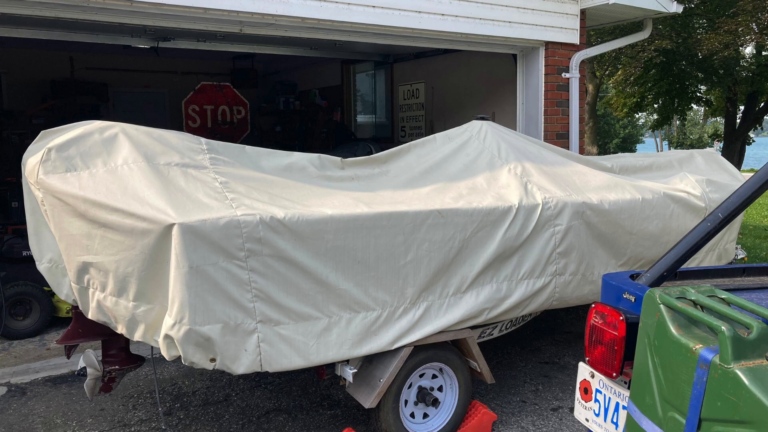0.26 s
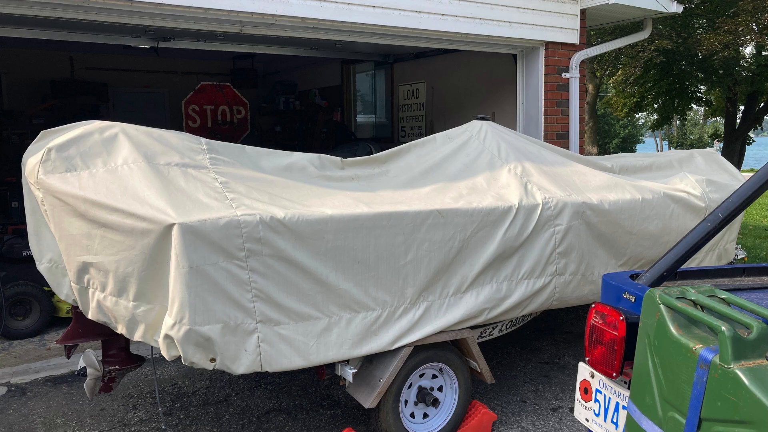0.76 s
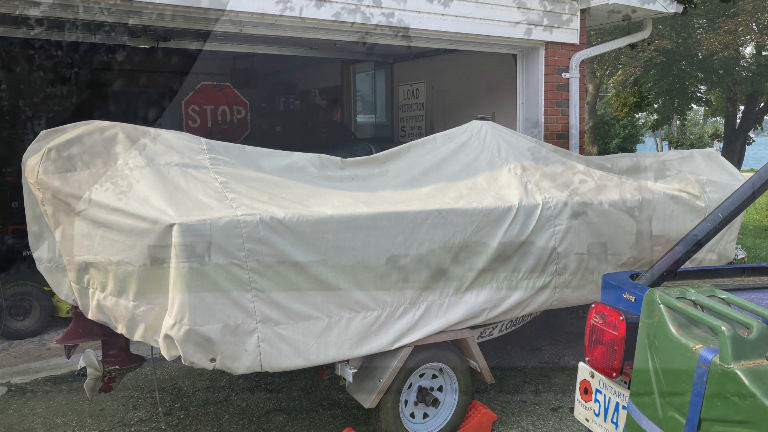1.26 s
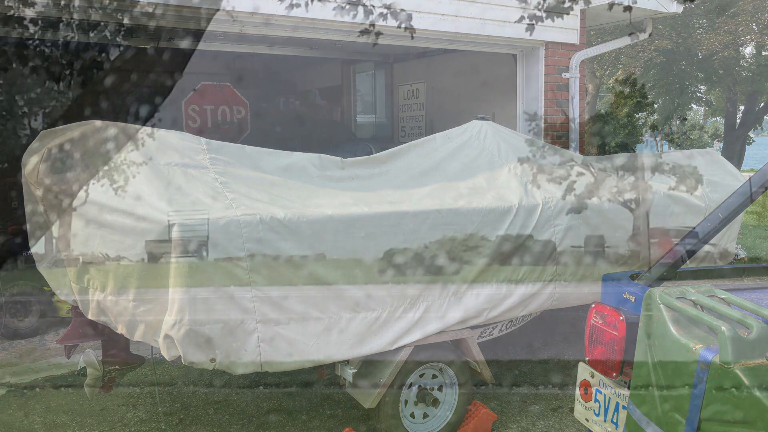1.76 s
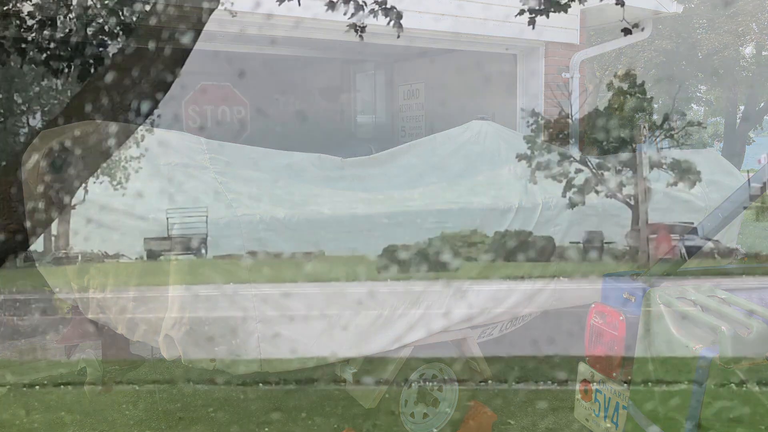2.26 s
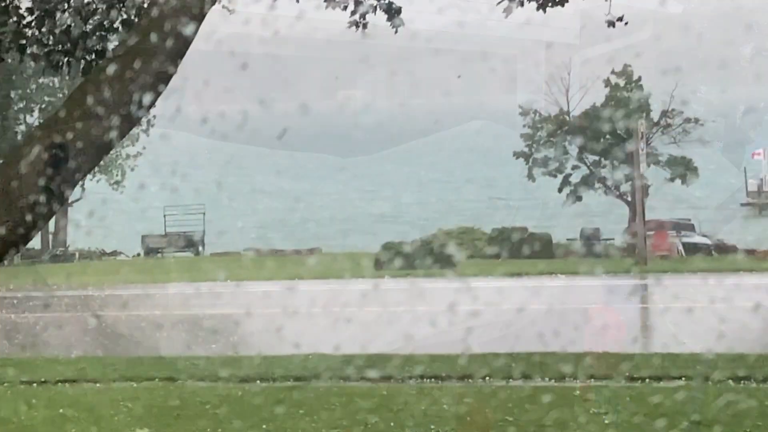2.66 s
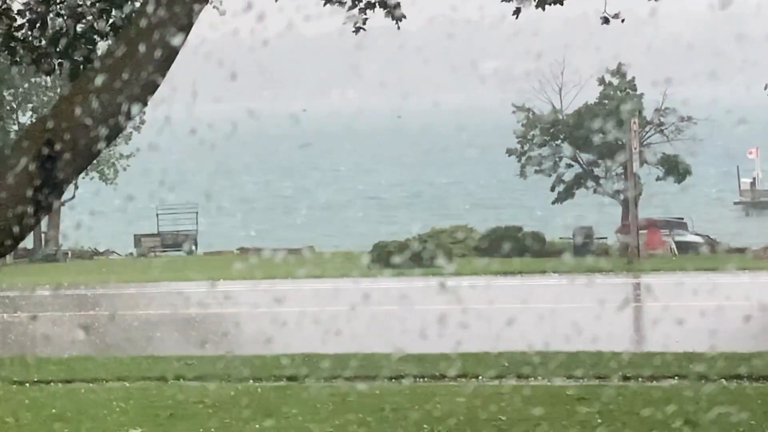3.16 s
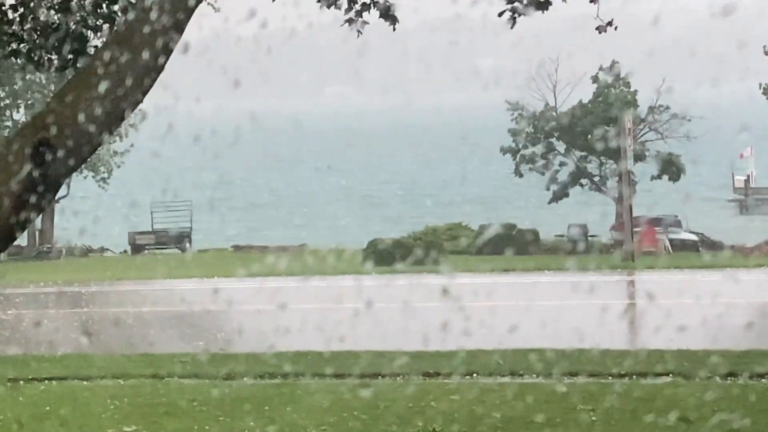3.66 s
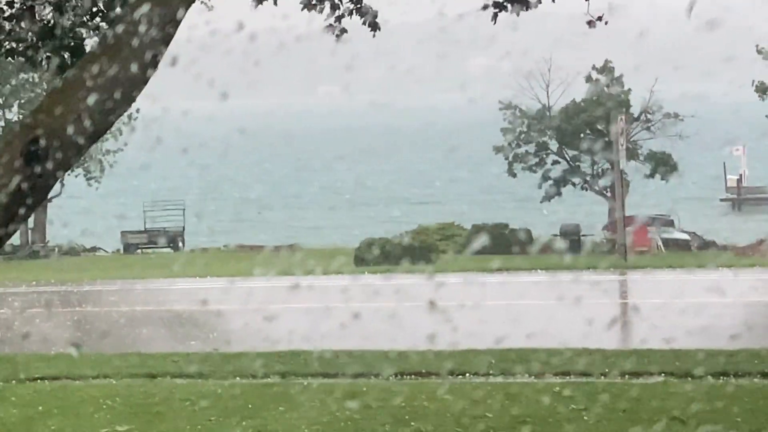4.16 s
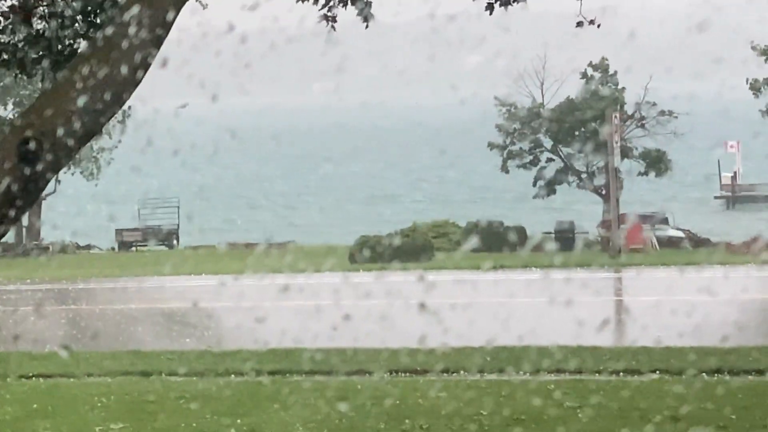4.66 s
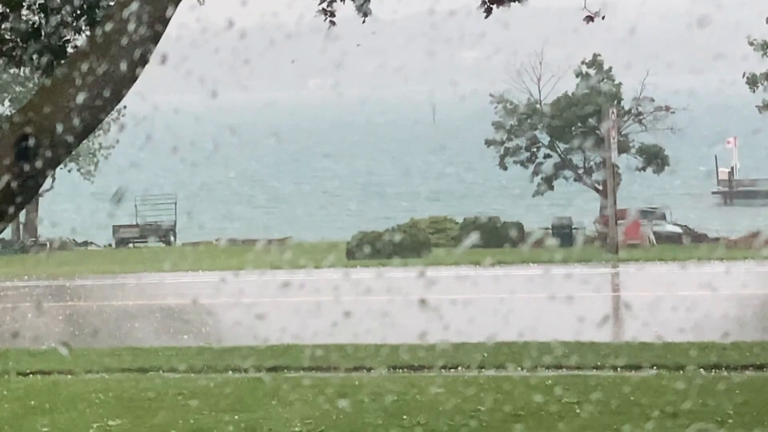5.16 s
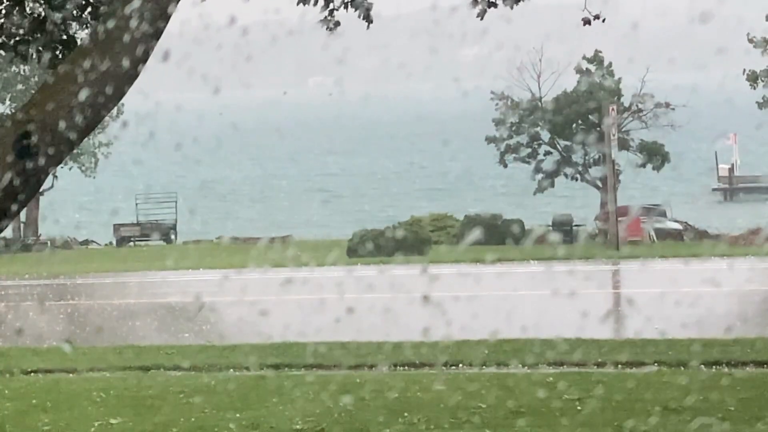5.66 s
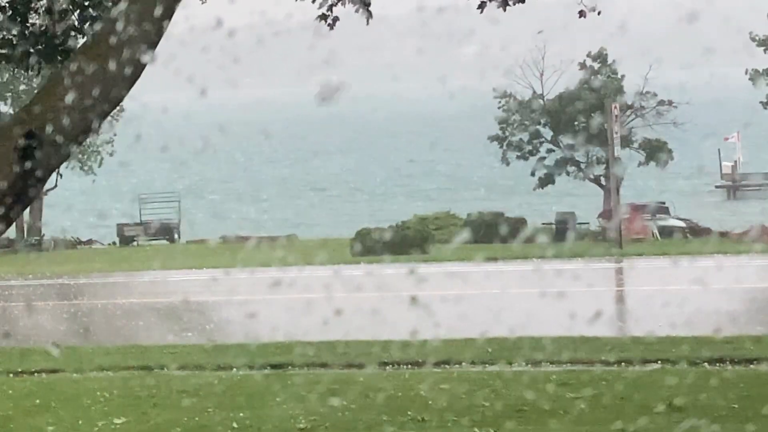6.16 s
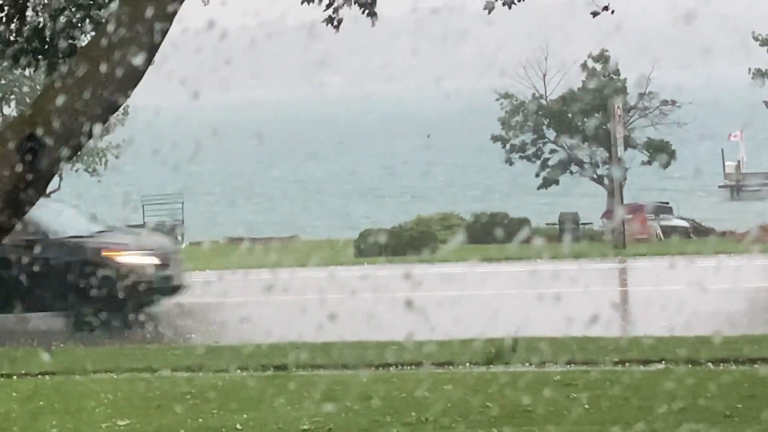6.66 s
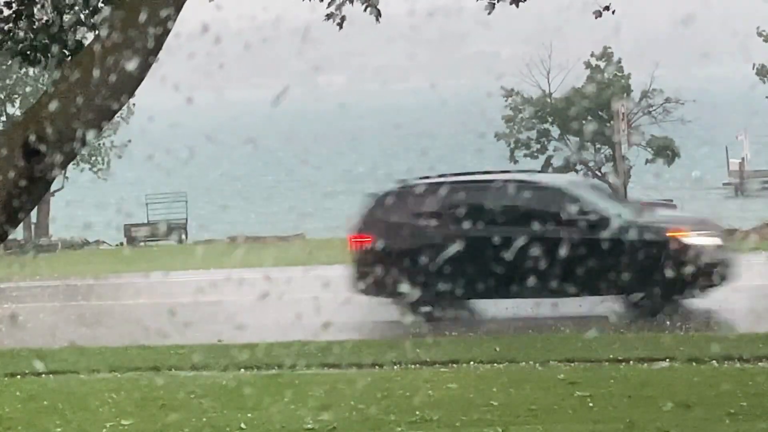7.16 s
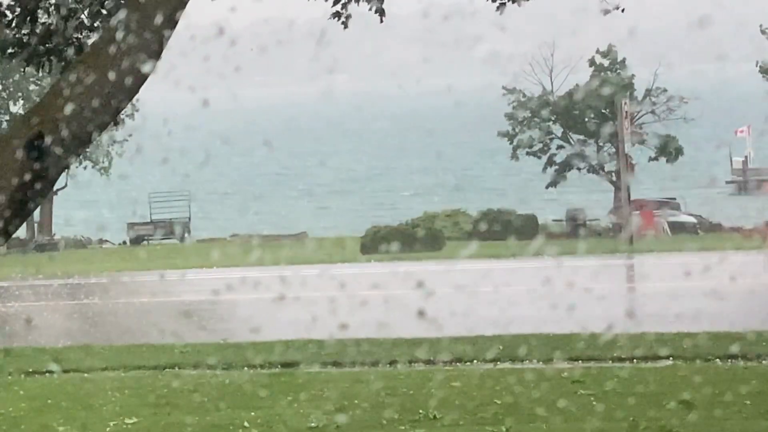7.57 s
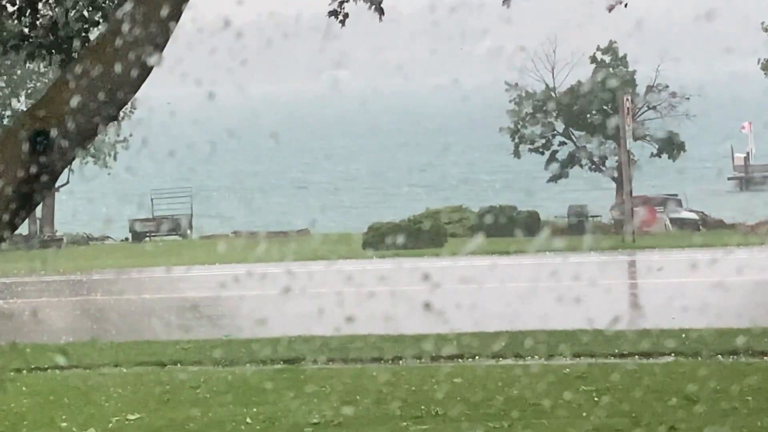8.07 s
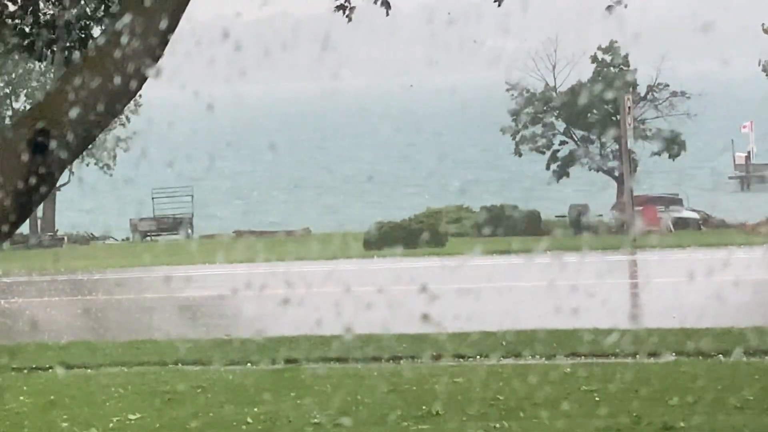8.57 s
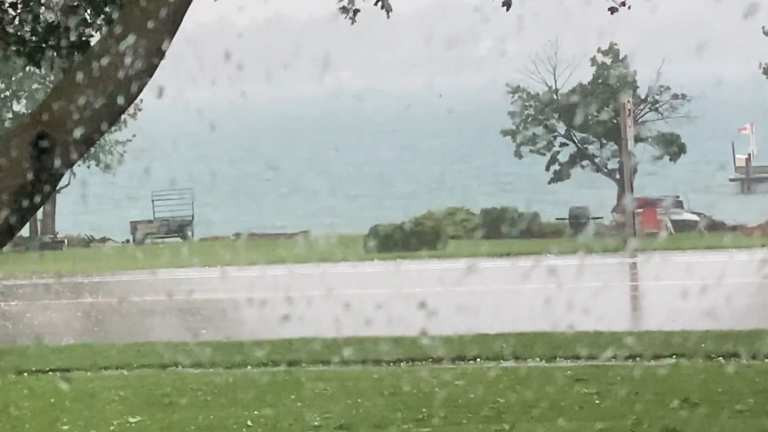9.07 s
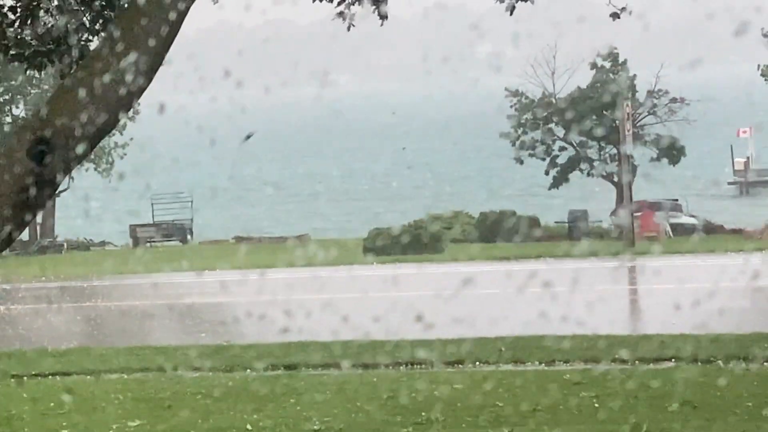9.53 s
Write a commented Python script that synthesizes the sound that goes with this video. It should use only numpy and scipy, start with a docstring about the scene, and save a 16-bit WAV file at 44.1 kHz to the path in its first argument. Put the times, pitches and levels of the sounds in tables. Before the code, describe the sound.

Inside a room close to a window, heavy rain drums on the pane after a slow fade-in. A thick, dull, steady patter carries random louder knocks and hollow plops, short watery fizzes and light ticks. Low gusty booming swells beneath. Around the middle, wet tyres add a barely noticeable high hiss. Big drops cluster more thickly near the end, and the rain continues to the cut.

```python
"""In a room, behind a window, storm rain is heard beating on the glass; the sound fades in.
Big drops thud and tap over a patter of small ones: each excites the pane, shaped as ringing noise.
Water sprays, spits and drips as short bursts of filtered noise over a steady wash of rain outdoors.
Wind and drops make the pane boom in its lowest modes, and a car hisses by faintly on the wet road."""
import sys
import numpy as np
from scipy import signal
from scipy.fft import irfft
from scipy.io import wavfile
from scipy.ndimage import uniform_filter1d

SR = 44100
rng = np.random.default_rng(int(sys.argv[2]) if len(sys.argv) > 2 else 0)


def master_out(mix):
    """Clip the mix to full scale and print it as 16-bit PCM to the path in sys.argv[1]."""
    frames = np.transpose(np.atleast_2d(mix))
    ceiling = np.clip(frames, -1, 1)
    pcm = np.round(ceiling * 32767).astype(np.int16)
    wavfile.write(sys.argv[1], SR, pcm)


N = 432180
TIME = np.arange(N) / SR  # seconds

# Big drops on the glass, landing at once or breaking up over several ms; levels are relative:
# start_s [s], knock_db [dB], thud_db [dB], tap_db [dB], rise_ms [ms]
BIG_DROPS = [(1.123, -29, -35, -38, 0.89), (1.444, -29, -31, -64, 1), (1.51, -29, -34, -47, 22),
             (1.642, -31.5, -31, -51, 3), (2.104, -26.5, -37, -44.5, 17), (2.145, -34, -36, -43.5, 31),
             (2.215, -33, -36, -48, 2.7), (2.381, -27.5, -40, -62, 15), (2.77, -29, -27.5, -49, 0.92),
             (2.796, -42, -29, -48, 1.6), (2.866, -28, -50, -40.5, 15), (2.986, -25, -22, -38.5, 0.9),
             (3.096, -28.5, -32, -45.5, 1.1), (3.422, -30, -24.5, -38, 1.5), (3.592, -30, -57, -65, 4.9),
             (3.655, -51, -36, -66, 5.6), (3.722, -29.5, -32.5, -43, 16), (3.901, -24.5, -29.5, -47.5, 14),
             (3.968, -25, -26, -43.5, 11), (4.038, -29, -49, -43, 12), (4.189, -30, -31.5, -45, 1),
             (4.212, -31, -25.5, -59, 2.6), (4.352, -22, -33.5, -47.5, 1), (4.649, -31.5, -35, -48.5, 13),
             (4.878, -29.5, -45, -48, 13), (4.94, -26, -61, -41, 7.4), (5.238, -31, -55, -42.5, 8.5),
             (5.34, -31.5, -28.5, -47, 4.1), (5.454, -31.5, -33, -43, 4.3), (5.668, -30.5, -33, -42, 1.3),
             (5.714, -23.5, -36, -39.5, 3.6), (5.769, -31, -31.5, -48, 1.7), (5.844, -49, -31, -47, 2.9),
             (5.927, -27.5, -29.5, -38, 1), (6.058, -24.5, -30, -46, 15), (6.105, -39, -40, -46, 1.9),
             (6.338, -19.5, -38.5, -48.5, 8), (6.831, -30, -35, -66, 13), (6.86, -31.5, -27, -48, 5.6),
             (7.122, -29.5, -26.5, -46.5, 18), (7.315, -25, -37, -42, 0.84), (7.345, -24.5, -27, -46, 1.9),
             (7.45, -35, -34, -48, 2.9), (7.683, -38, -31, -48, 0.92), (7.73, -33, -37, -49, 7.7),
             (7.778, -26, -35, -51, 15), (8.054, -40, -31, -52, 9), (8.485, -41, -25.5, -39.5, 0.86),
             (8.505, -27.5, -24, -49, 1.6), (8.619, -36, -30, -73, 4.4), (8.812, -28, -33.5, -54, 7.7),
             (8.936, -21.5, -37, -39, 1.1), (8.96, -24.5, -29.5, -70, 5.3), (9.17, -32, -34.5, -49.5, 5.1),
             (9.425, -28, -29, -48, 0.9), (9.497, -34, -35, -46, 2.3), (9.595, -45, -25.5, -62, 1),
             (9.614, -28, -49, -58, 1), (9.662, -25, -40.5, -44, 3.2), (9.695, -35, -33, -38.5, 10),
             (9.743, -17.5, -39, -40, 3.9)]
# Strength of the storm over time: time_s [s], level_db [dB, relative]
STORM_STRENGTH = [(1.2, -42), (2.6, -42.5), (2.98, -42.5), (3.28, -38.5), (3.38, -43.5), (3.55, -40.5),
                  (4.12, -42.5), (4.55, -43), (4.94, -39.5), (5.65, -40.5), (6.45, -40.5), (6.75, -40.5),
                  (7.2, -43), (7.63, -42), (7.8, -42.5), (8.2, -45.5), (8.5, -42.5), (8.71, -39),
                  (9.28, -43.5), (9.58, -36.5), (9.8, -39.5)]


def from_db(db):
    """Turns decibels into a factor of amplitude."""
    return 10 ** (np.asarray(db) / 20)


def read(points, hz, axis=1):
    """Reads one column of a table, joined by straight lines on a log-frequency axis."""
    table = np.transpose(points)
    return np.interp(np.log(hz + 1), np.log(table[0] + 1), table[axis])


def evened(x, size=None):
    """Scales a stereo sound so that the mean of its channels has rms 1 over its first samples, or all."""
    middle = x.mean(0)[:size]
    return x / np.sqrt(np.mean(middle ** 2) + 1e-20)


def add(mix, start_s, sound):
    """Adds a sound to the mix at its start time, cut off where the mix ends."""
    part = mix[:, max(round(start_s * SR), 0):][:, :sound.shape[1]]
    part += sound[:, :part.shape[1]]


def diffuse(hz):
    """Random spectrum of sound from many directions at two microphone ports, about flat in their sum."""
    # The two ports: pitch_hz [Hz], coherence [0 to 1], left_lead_rad [radians], left_minus_right_db [dB]
    ports = [(50, .99, 0, -1.2), (150, .95, -.05, -1.3), (380, .72, .1, -.4), (600, .18, .3, 1.8),
             (800, .33, .4, 1.8), (1100, .05, 0, 1), (1250, .17, -2.5, .6), (1650, .6, -2.4, 0),
             (2000, .38, -2.2, .3), (2250, .25, 0, 1.6), (2900, .22, 1.8, 1), (4400, .12, -.5, .5),
             (5600, .4, 2.2, 0), (6700, .85, 0, 0), (10000, .96, 0, 0)]
    shared, separate = rng.standard_normal((2, len(hz))) + 1j * rng.standard_normal((2, len(hz)))
    same = np.clip(read(ports, hz, axis=1), 0, 1)
    phase = read(ports, hz, axis=2)
    right = (same * shared + np.sqrt(1 - same ** 2) * separate) * np.exp(-1j * phase)
    lean = from_db(read(ports, hz, axis=3) / 2)
    return np.array([shared * lean, right / lean]) / np.sqrt(1.001 + same * np.cos(phase))


def noise(colour, size):
    """Stereo noise whose gain over frequency is the function colour."""
    hz = np.fft.rfftfreq(size, 1 / SR)
    return evened(irfft(diffuse(hz) * colour(hz), size))


def firm(x, size):
    """Holds the level of a stereo ring even, so that it can die away solidly instead of fluttering."""
    power = (x ** 2).mean(-2, keepdims=True)
    power = uniform_filter1d(uniform_filter1d(power, size), size)
    return x * np.sqrt(power.mean(-1, keepdims=True) / (abs(power) + 1e-30))


def hump(centre_hz, octaves):
    """A bell-shaped band on the octave scale; octaves is its standard deviation."""
    return lambda hz: np.exp(-.5 * (np.log2((hz + 1) / centre_hz) / octaves) ** 2)


def blows(count, crack, smack_db=0, crack_s=.016, uneven_db=4.2, size=12288):
    """Responses of the pane, each struck at another spot: (thud, knock, tap, splash) parts of each."""
    # Colour of a blow on the glass: pitch_hz [Hz], level_db [dB per Hz, relative]
    glass = [(60, 0.5), (110, 0.5), (180, 4.5), (270, -4), (400, -8), (560, -14), (820, -17), (1150, -26.5),
             (1750, -31), (2250, -23.5), (2900, -35.5), (4600, -34.5), (5700, -49.5), (8000, -51),
             (12000, -100)]
    # Modes of the pane and its frame: pitch_hz [Hz], width_hz [Hz, at half the lift], lift_db [dB]
    pane_modes = [(116.64, 3.6, 13), (166.3, 9.8, 4.5), (220, 6.4, 7), (289.5, 13.6, 8), (334, 12, 5.5),
                  (369, 14, 3), (403, 26, 4), (509.4, 6.3, 4.5), (1956, 41, 6.5)]
    # Ring of pane and room, from thud to splash: pitch_hz [Hz], rise_s [s], time to fall by 60 dB [s]
    ring = [(267, 0.0031, 0.64), (700, 0.0024, 0.39), (2210, 0.0054, 0.63), (4600, 0.0086, 0.53)]
    hz, t = np.fft.rfftfreq(size, 1 / SR), np.arange(size) / SR
    colour_db = read(glass, hz)
    for mode_hz, width_hz, lift_db in pane_modes:
        colour_db = colour_db + lift_db / (1 + (2 * (hz - mode_hz) / width_hz) ** 2)
    colour_db = colour_db + smack_db * hump(1450, .35)(hz)
    colour = from_db(colour_db) * hz ** 2 / (hz ** 2 + 45 ** 2)  # less bass below 45 Hz
    centres_hz, rise_s, t60_s = np.transpose(ring)
    # four bands that cross over into one another
    bands = np.array([np.interp(np.log(hz + 1), np.log(centres_hz), row) for row in np.eye(len(ring))])
    # the glass cracks out first, then the room dies away
    rising = 1 - np.exp(-t / rise_s[:, None])
    cracking = 1 + crack * np.exp(-t / crack_s)
    falling = np.exp(-np.log(1000) * t / t60_s[:, None])
    shape = rising * cracking * falling
    places_hz = np.linspace(0, np.sqrt(SR / 2), 130) ** 2  # closer together in the bass
    for _ in range(count):
        # each spot drives some modes well and misses others
        spot = from_db(uneven_db * np.interp(hz, places_hz, rng.standard_normal(len(places_hz))))
        struck = irfft(diffuse(hz) * (spot * colour * bands)[:, None], size)
        yield firm(struck, size=900) * shape[:, None]


def drop_size(draw):
    """Turns an even draw from 0 to 1 into a size: mostly small, seldom big, never above 3."""
    return min(-np.log(1 - draw), 3)


def drips(count, low_hz, span_octaves, level_db, fall_db, spread_db, octaves, rise_s, ring_s):
    """Scattered short bands of noise, each at its own pitch; fall_db is added per octave upward."""
    out, t = np.zeros((2, N)), np.arange(4096) / SR
    envelope = (1 - np.exp(-t / rise_s)) * np.exp(-t / ring_s)
    for when, height, size in rng.random((count, 3)):
        above = span_octaves * height
        note = noise(hump(low_hz * 2 ** above, octaves), size=len(t)) * envelope
        add(out, when * N / SR, note * from_db(level_db + fall_db * above + spread_db * size ** 2))
    return out


def wash(level_db=-47):
    """The far, steady wash of rain outdoors: coloured noise."""
    # Colour of the wash: pitch_hz [Hz], level_db [dB per Hz, relative]
    wash_colour = [(25, -6), (100, 14), (500, -6.5), (2300, -14), (4600, -27.5), (6000, -43), (9000, -34),
                   (13000, -34), (14500, -53)]
    return from_db(level_db) * noise(lambda hz: from_db(read(wash_colour, hz)), N)


def patter(level_db=5, body_db=-4.5, knock_db=2.0, per_s=135, spread_db=2.5, colour_db=2):
    """Small drops of uneven size strike spots all over the pane, harder in the gusts."""
    out = np.zeros((2, N))
    spots = list(blows(count=28, crack=1.3, crack_s=.011))
    drops_per_spot = round(per_s * N / SR / len(spots))
    for parts in spots:
        shares = from_db(colour_db * rng.standard_normal(len(parts)) + [body_db, knock_db, 0, 0])
        blow = np.tensordot(shares, parts, 1)  # the four parts mixed
        for when, draw in rng.random((drops_per_spot, 2)):
            add(out, when * N / SR, blow * from_db(spread_db * drop_size(draw)))
    strength_db = np.interp(TIME, *np.transpose(STORM_STRENGTH))
    return evened(out) * from_db(strength_db + level_db)


def clatter():
    """Middling drops slap the glass with a dry, pitchless tap: brief bursts of broad noise."""
    return drips(count=600, low_hz=1110, span_octaves=2.61, level_db=-53.5, fall_db=-5.5,
                 spread_db=10, octaves=0.25, rise_s=0.00065, ring_s=0.009)


def faint_notes():
    """Faint, narrow notes of noise at scattered high pitches, each dying within a fraction of a second."""
    return drips(count=900, low_hz=1722, span_octaves=2.17, level_db=-64.0, fall_db=-9.0,
                 spread_db=11.0, octaves=0.054, rise_s=0.0059, ring_s=0.065)


def plops():
    """Drips on sill and frame give hollow notes of noise under the patter."""
    return drips(count=200, low_hz=393, span_octaves=1.84, level_db=-44.5, fall_db=-6.5,
                 spread_db=10.5, octaves=0.088, rise_s=0.0041, ring_s=0.025)


def spatter(level_db=-62, per_s=90, spread_db=3.5, low_hz=2400, span_octaves=1.5, fall_db=-11,
            octaves=0.07, ring_s=0.011):
    """Separate specks of water tick on the glass as dying bits of noise; the higher, the fainter."""
    out, t = np.zeros((2, N)), np.arange(2048) / SR
    heights = span_octaves * np.linspace(0, 1, 24)
    specks_per_pitch = round(per_s * N / SR / len(heights))
    for above in heights:
        speck = noise(hump(low_hz * 2 ** above, octaves), size=len(t)) * np.exp(-t / ring_s)
        for when, draw in rng.random((specks_per_pitch, 2)):
            add(out, when * N / SR, speck * from_db(spread_db * drop_size(draw) + fall_db * above))
    return from_db(level_db) * evened(out)


def boom(wind_db=2.5, kick_db=-9, rise_s=0.034, settle_s=0.044):
    """Wind keeps the lowest modes of the pane swinging; each big drop and each buffet kicks them further."""
    # Lowest modes, in which the whole pane bends:
    # pitch_hz [Hz], width_hz [Hz, roughly, at half height], level_db [dB, relative]
    low_modes = [(40, 4.1, -16), (48.2, 21, 7.5), (68.4, 21, -28), (90.2, 19, 4)]
    # Gusts that buffet the pane: start_s [s], level_db [dB]
    buffets = [(1.64, -24.5), (2.12, -29), (2.53, -32.5), (2.79, -26.5), (3.74, -31), (4.1, -28.5),
               (4.21, -31), (5.69, -24), (5.84, -30), (7.15, -34.5), (7.439, -23.5), (8.14, -34),
               (8.3, -33), (8.5, -33), (8.7, -29.5), (8.9, -30)]

    def mode_colour(hz):
        peaks = sum(from_db(db) / (1 + ((hz - mode_hz) / (width_hz / 2.17)) ** 2)
                    for mode_hz, width_hz, db in low_modes)
        return peaks * hz ** 4 / (hz ** 4 + 30 ** 4)  # the microphone loses the deepest bass

    swing = noise(mode_colour, N)
    # hold the swing at an even level, so that wind and kicks alone set its strength
    swing = swing / np.sqrt(uniform_filter1d(swing.mean(0) ** 2, size=8000) + 1e-6)
    t = np.arange(SR) / SR
    kick = np.minimum(t / rise_s, 1) * np.exp(-np.maximum(t - rise_s, 0) / settle_s)
    strength_db = np.interp(TIME, *np.transpose(STORM_STRENGTH))
    power = from_db(strength_db + wind_db)[None] ** 2
    for start_s, _, thud_db, _, _ in BIG_DROPS:
        add(power, start_s, (from_db(thud_db + kick_db) * kick[None]) ** 2)
    for start_s, db in buffets:
        add(power, start_s, (from_db(db) * kick[None]) ** 2)
    return swing * np.sqrt(power)


def sprays(grain=0.22):
    """Water sprays over the glass in fine droplets: a quick swell of grainy fizz that trails off."""
    # Sprays: start_s [s], length_s [s, loudest after a quarter], centre_hz [Hz],
    # width_octaves [octaves], level_db [dB]
    spray_list = [(0.903, 0.18, 1640, 0.94, -43), (3.436, 0.15, 5630, 0.49, -54.5),
                  (3.71, 0.15, 5200, 0.51, -54), (7.516, 0.085, 4840, 0.31, -56.5),
                  (8.474, 0.16, 6050, 0.57, -63.5), (9.663, 0.11, 6000, 0.39, -61),
                  (9.745, 0.061, 2880, 0.13, -44)]
    out = np.zeros((2, N))
    for start_s, length_s, centre_hz, octaves, db in spray_list:
        fizz = noise(hump(centre_hz, octaves), size=16384)
        t = np.arange(fizz.shape[1]) / SR
        u = t / (length_s / 4)
        swell = u * np.exp(1 - u)
        droplets = np.exp(grain * np.interp(t, np.linspace(0, t[-1], 128), rng.standard_normal(128)))
        add(out, start_s, from_db(db) * fizz * droplets * swell)
    return out


def spits(level_db=-1, octaves=.28, rise_s=.005, fall_s=.017):
    """Single drops burst on the glass: each a quick spit of fizz, a band of noise that soon dies."""
    # Spits: start_s [s], centre_hz [Hz], level_db [dB, relative]
    spit_list = [(1.115, 6050, -50.5), (2.646, 4500, -55), (2.818, 3700, -45.5), (2.865, 4400, -48),
                 (3.004, 4800, -55), (3.158, 4800, -60), (3.289, 8850, -63.5), (4.356, 3000, -46.5),
                 (5.225, 4400, -55.5), (5.404, 5260, -57), (5.46, 5500, -60), (5.568, 6800, -60),
                 (5.67, 4700, -57), (5.865, 5300, -57), (5.985, 6400, -54.5), (6.364, 8850, -60),
                 (6.582, 9800, -63), (6.689, 7560, -64), (6.87, 5900, -54.5), (7.312, 5030, -51),
                 (7.344, 5700, -57), (7.559, 3500, -46), (7.811, 5140, -56.5), (8.932, 5000, -48),
                 (9.134, 3920, -49.5), (9.492, 4340, -45)]
    out, t = np.zeros((2, N)), np.arange(8192) / SR
    envelope = (1 - np.exp(-t / rise_s)) * np.exp(-t / fall_s)
    envelope = envelope / envelope.max()
    for start_s, hz, db in spit_list:
        fizz = noise(hump(hz, octaves), size=len(t))
        add(out, start_s, from_db(db + level_db) * fizz * envelope)
    return out


def big_drops(thud_db=-3, knock_db=-13.5, tap_db=-5.5, splash_db=-19, uneven_db=5.5):
    """Heavy drops strike the pane, each with its own thud, knock and tap; the splash follows the tap level."""
    out = np.zeros((2, N))
    # the smack strengthens the middle of the spectrum
    spots = blows(count=len(BIG_DROPS), smack_db=4.5, crack=.9, uneven_db=uneven_db)
    for (start_s, knock, thud, tap, rise_ms), parts in zip(BIG_DROPS, spots):
        t_ms = np.arange(parts.shape[-1]) / SR * 1000
        landing = 1 - np.exp(-t_ms / rise_ms)
        gains = from_db([thud + thud_db, knock + knock_db, tap + tap_db, tap + splash_db])
        drop = sum(gain * evened(part * landing, size=2400) for gain, part in zip(gains, parts))
        add(out, start_s, drop)
    return out


def raps(rise_s=0.002, ring_s=.02, ring_width_hz=250, damping=.3):
    """Hard drops ring briefly, each at the pitch of the spot that it hits; narrow notes ring longer."""
    # Raps: start_s [s], centre_hz [Hz], width_octaves [octaves], level_db [dB]
    rap_list = [(1.124, 850, .7, -30), (2.771, 820, 0.24, -34.5), (2.916, 4600, 0.47, -45.5),
                (2.983, 1150, 0.41, -35.5), (2.99, 2230, 0.072, -42), (2.992, 373, 0.41, -27),
                (3.097, 1330, .3, -36.5), (3.308, 2340, 0.17, -42.5), (3.423, 1700, 0.25, -34),
                (3.464, 363, 0.22, -32), (3.53, 360, .3, -44), (4.188, 825, 0.27, -27),
                (4.189, 1800, 0.3, -37), (4.35, 885, 0.41, -33), (4.366, 447, 0.35, -29.5),
                (5.318, 5860, .056, -51), (5.552, 3000, 0.056, -42), (5.671, 437, 0.23, -26.5),
                (5.714, 1000, .44, -47), (5.725, 2290, 0.25, -38), (5.928, 2210, 0.17, -31),
                (5.94, 368, 0.22, -23), (6.075, 400, 0.13, -38), (6.345, 493, 0.52, -31),
                (7.315, 1400, 0.67, -43), (7.353, 1200, 1, -39), (7.565, 1930, 0.22, -38.5),
                (7.683, 520, 0.66, -33.5), (7.738, 2150, .1, -38.5), (7.778, 402, 0.36, -35.5),
                (8.487, 870, 0.25, -34), (8.504, 380, .3, -35), (8.508, 3000, 0.15, -38),
                (8.937, 1200, 1, -34), (8.949, 2400, 0.25, -33.5), (9.424, 650, .5, -39),
                (9.497, 5940, 0.05, -47), (9.592, 394, 0.42, -35), (9.612, 794, 0.56, -31),
                (9.661, 3120, 0.24, -40.5), (9.742, 1900, .53, -32), (9.755, 1600, 0.52, -30.5)]
    out, t = np.zeros((2, N)), np.arange(8192) / SR
    for start_s, hz, octaves, db in rap_list:
        faster = (hz * octaves / ring_width_hz) ** damping  # wide notes die sooner
        envelope = (1 - np.exp(-t / rise_s)) * np.exp(-t / ring_s * faster)
        note = firm(noise(hump(hz, octaves), size=len(t)), size=260) * envelope
        # the envelope alone sets the energy of the note
        add(out, start_s, from_db(db) * evened(note) * np.sqrt(np.mean(envelope ** 2)))
    return out


def car(level_db=-67.5, centre_hz=8000, octaves=0.2, flicker_db=2.8, nearest_s=6.36, passing_s=0.22):
    """Wet tyres hiss past: a flickering band of noise, at half its height passing_s before and after."""
    nearness = 1 / (1 + ((TIME - nearest_s) / passing_s) ** 2)
    flicker = from_db(flicker_db * np.interp(TIME, np.linspace(0, N / SR, 500), rng.standard_normal(500)))
    return from_db(level_db) * flicker * noise(hump(centre_hz, octaves), N) * nearness


def scene():
    """Heavy drops, sprays, the booming pane and a passing car stand over a bed of rain."""
    bed = wash() + patter() + clatter() + faint_notes() + plops() + spatter()
    return bed + boom() + sprays() + spits() + big_drops() + raps() + car()


def record(dry):
    """The sound fades in from silence; then a low-pass filter takes away the highest treble."""
    faded = dry * np.interp(TIME, (.8, 2.8), [0, 1])  # start and end of the fade, in seconds
    low_pass = signal.firwin(511, 15000, window=("kaiser", 9), fs=SR)  # cutoff in Hz
    return signal.oaconvolve(faded, low_pass[None], "same")


dry = scene()
out = record(dry)
master_out(out)
```